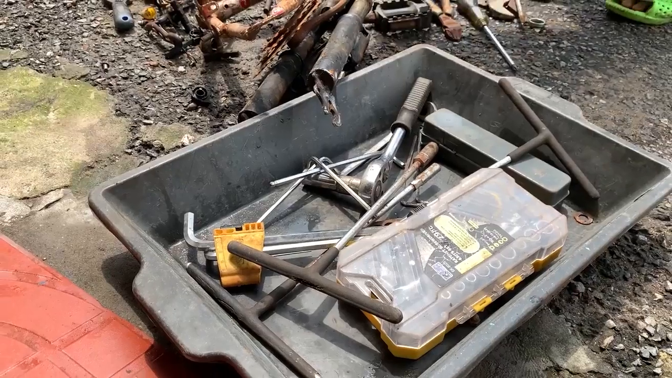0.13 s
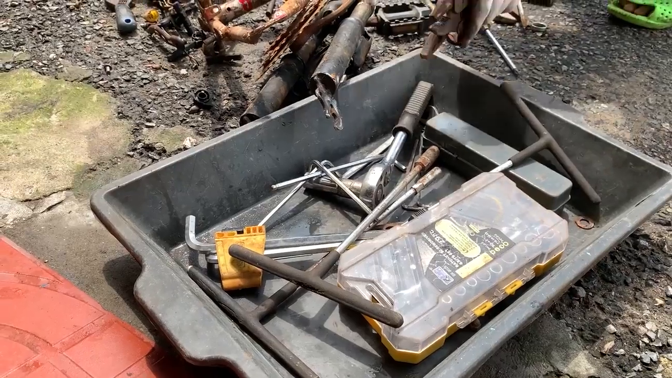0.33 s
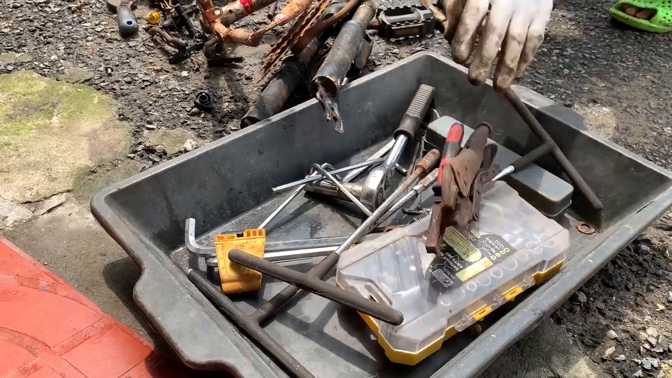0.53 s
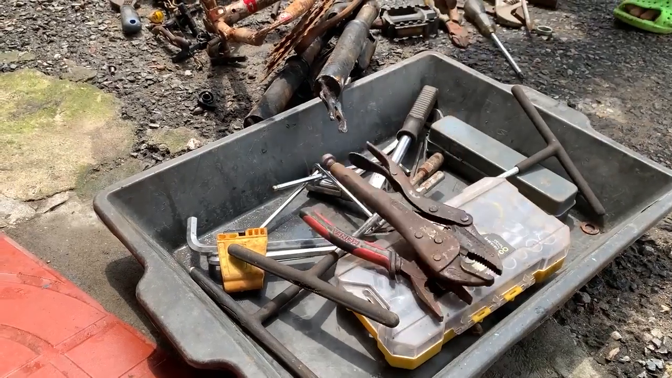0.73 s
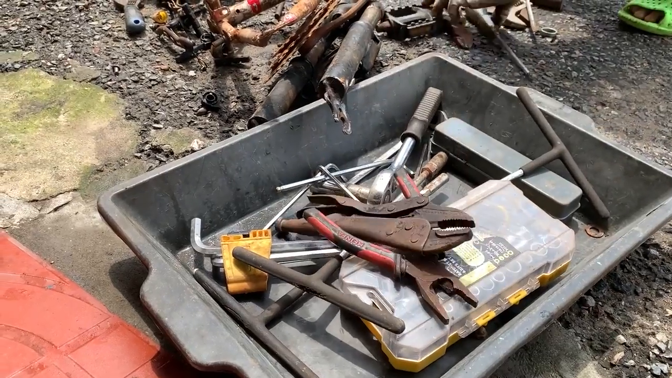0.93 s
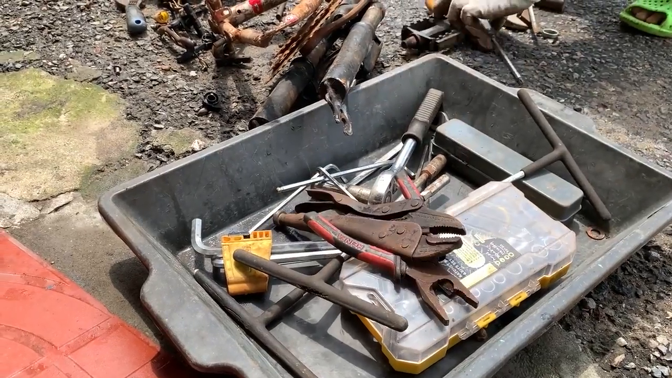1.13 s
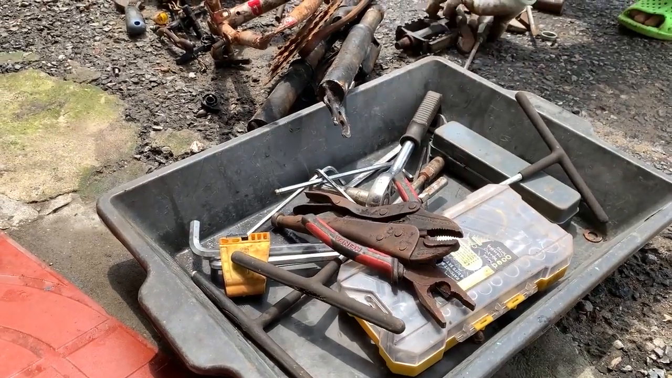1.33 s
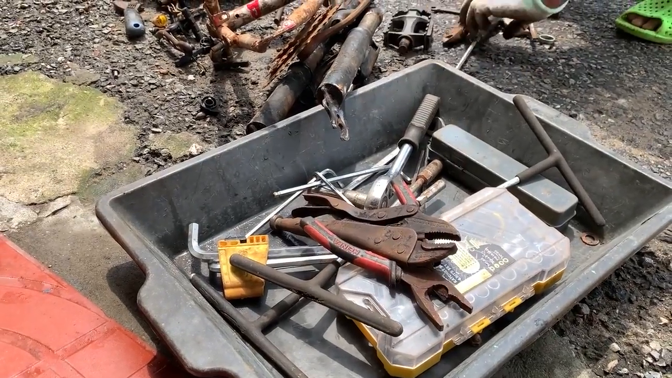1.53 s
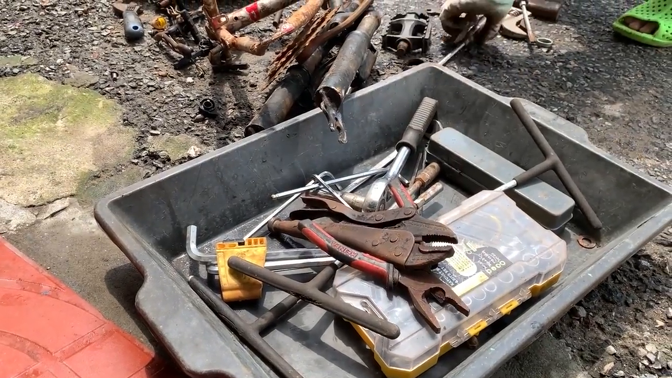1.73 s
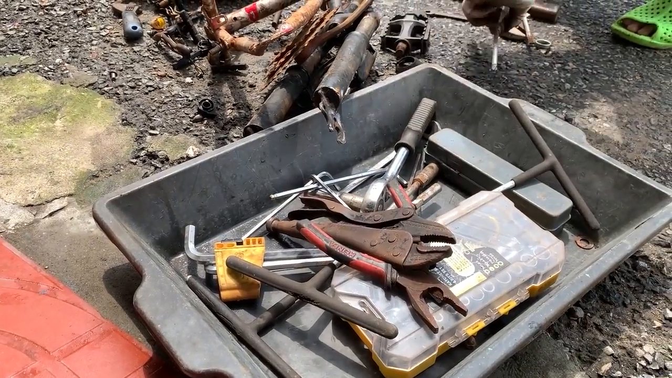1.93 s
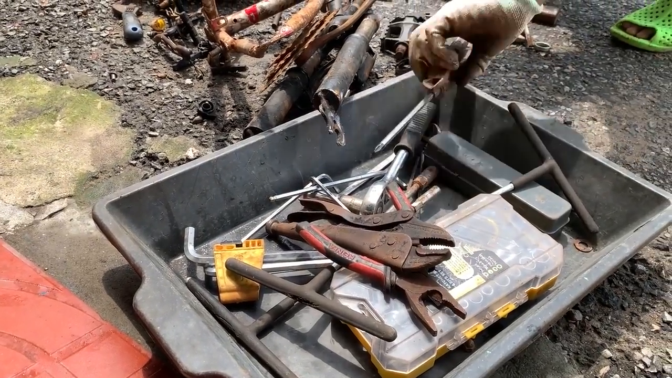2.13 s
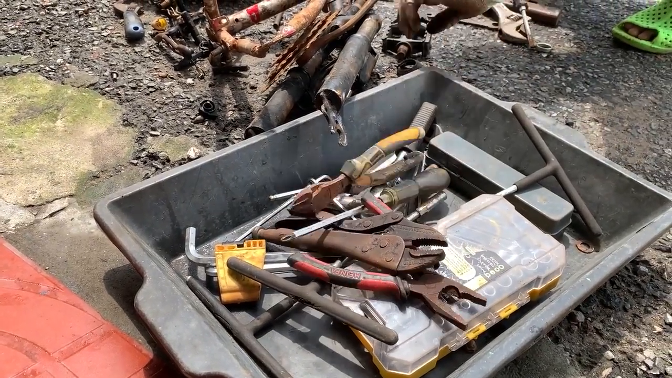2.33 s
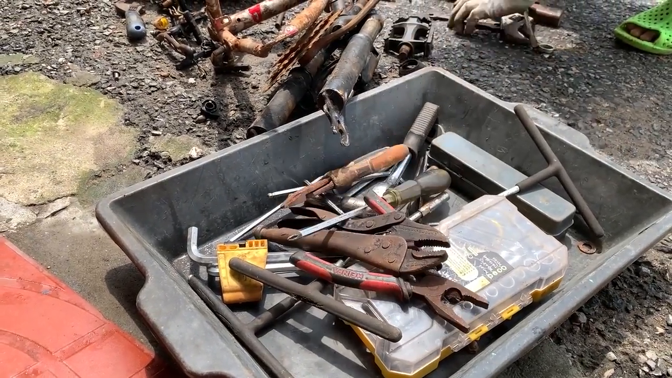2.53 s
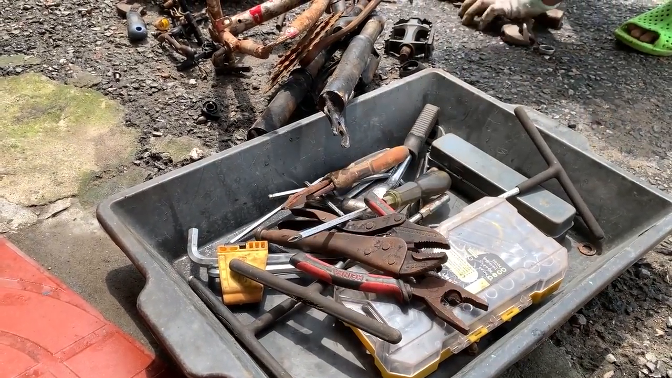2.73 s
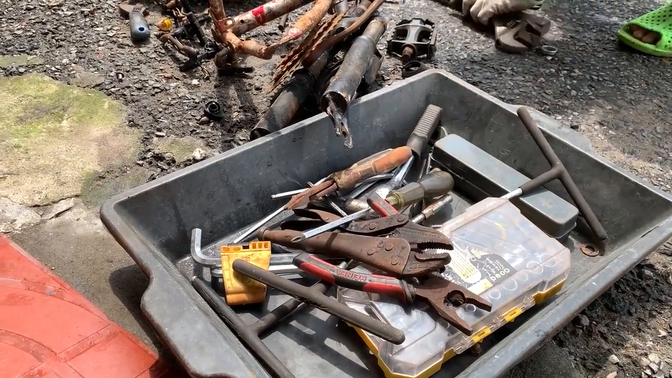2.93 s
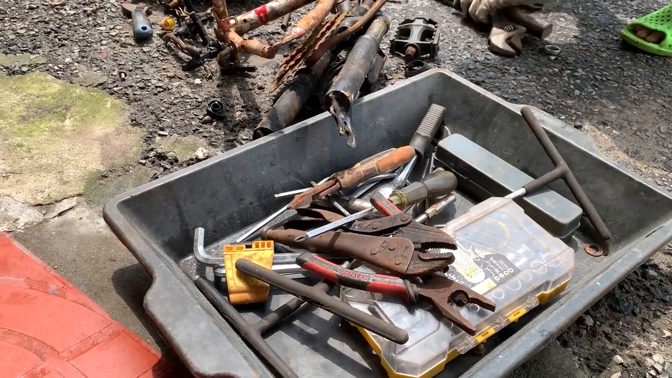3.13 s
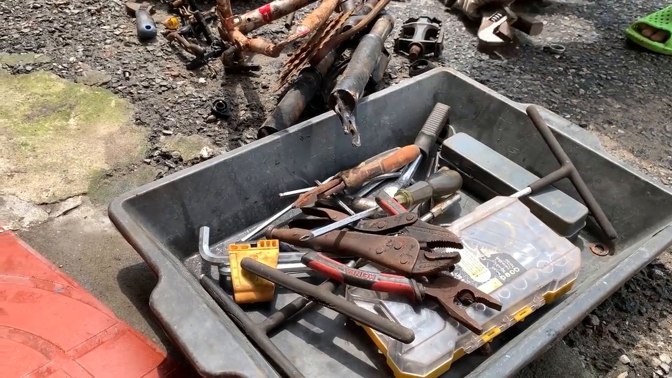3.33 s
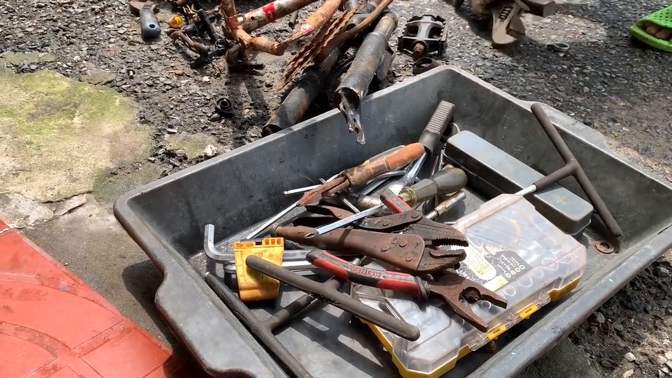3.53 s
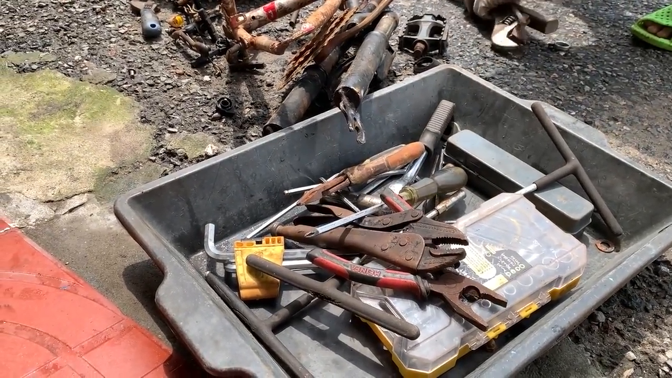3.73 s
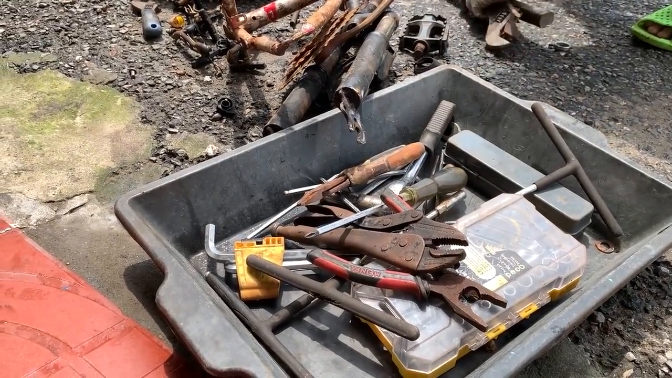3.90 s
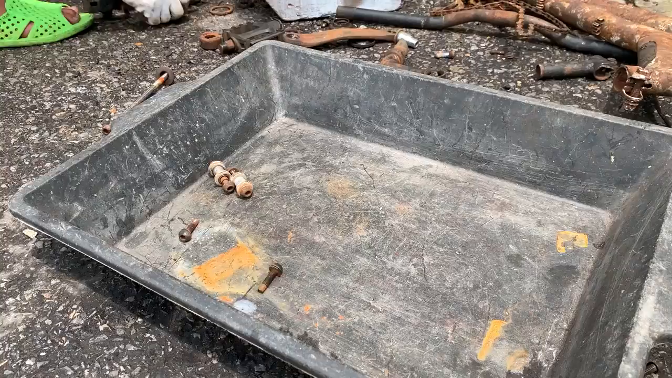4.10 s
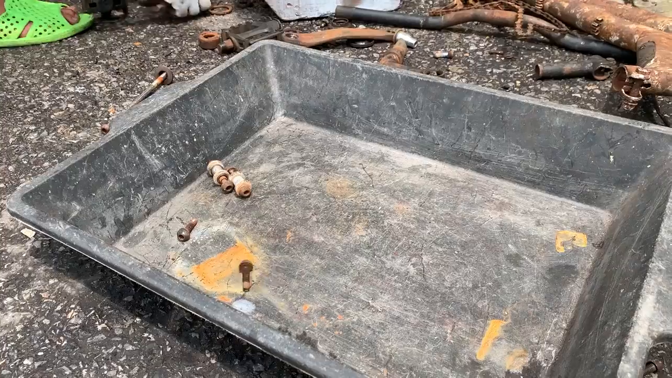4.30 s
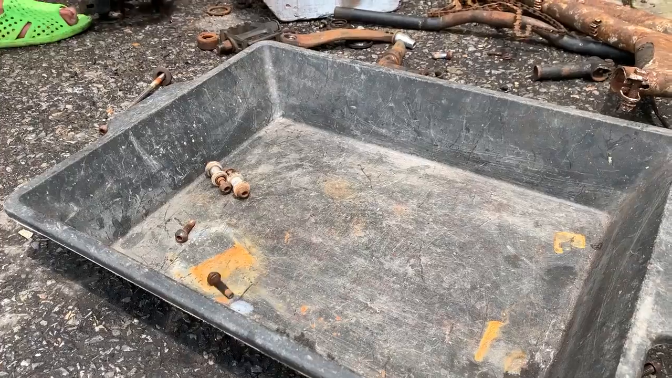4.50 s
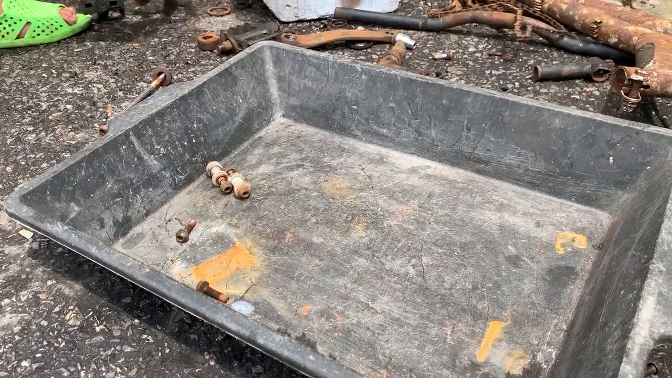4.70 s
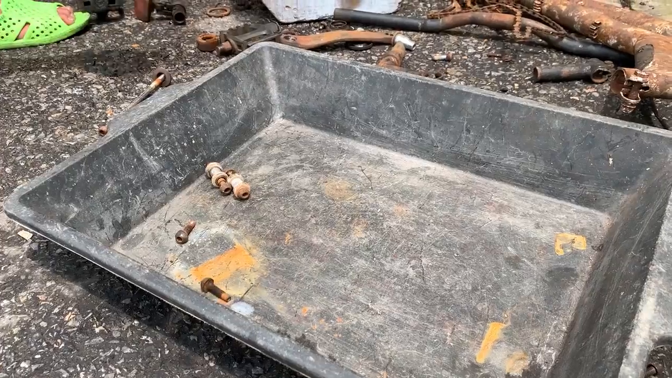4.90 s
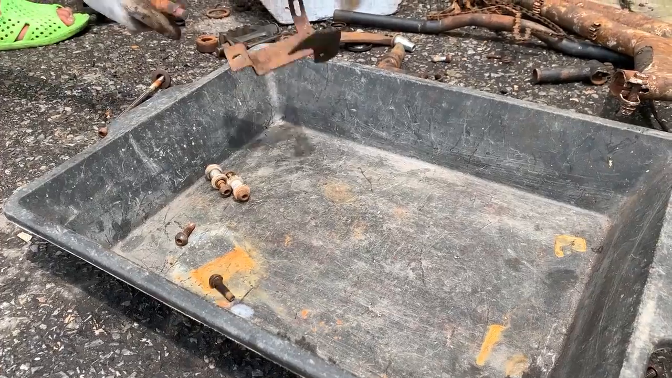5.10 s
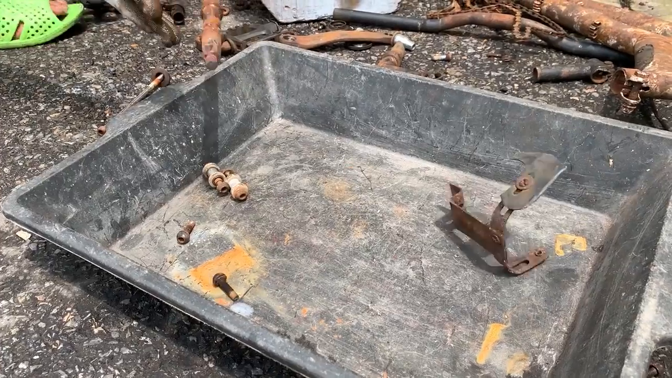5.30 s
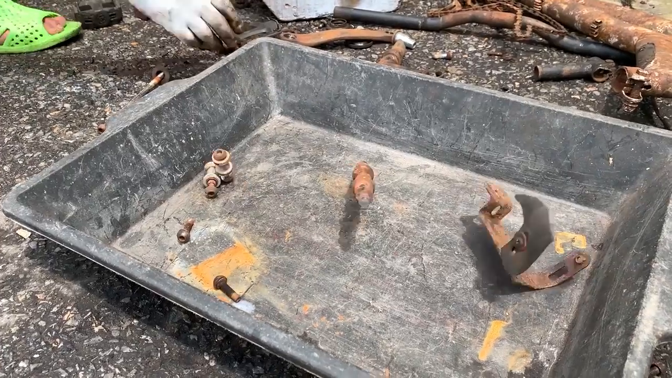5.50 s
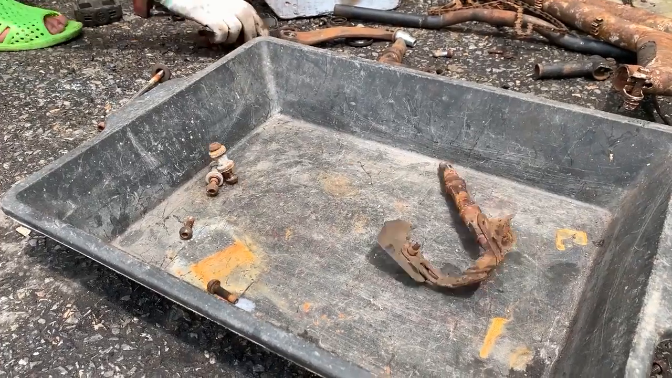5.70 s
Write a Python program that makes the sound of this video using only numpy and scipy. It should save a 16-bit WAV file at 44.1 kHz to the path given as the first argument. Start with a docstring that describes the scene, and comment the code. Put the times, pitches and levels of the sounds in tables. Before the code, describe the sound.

Rusty pliers and a screwdriver clatter into a full plastic tool tray, a spanner scrapes steel parts, then metal pieces thud into an empty tray outdoors.

```python
"""Outdoors on rough pavement, under soft open air and low wind, heard by a close pair of small microphones.
First rusty pliers and a screwdriver drop into a full plastic tray: blows ring its modes with noisy contacts.
Then a spanner scrapes and clinks on bicycle parts: ringing steel modes, friction noise and ticks of grit.
At 4.2 s the scene jumps to an empty tray: parts are picked off the ground with small clinks.
Last, a bracket and a bolt are tossed in and tumble, with thuds, clacks and a dying rattle."""
import sys
import numpy as np
from scipy import signal
from scipy.fft import rfft, irfft
from scipy.io import wavfile
from scipy.ndimage import map_coordinates

SR = 44100
rng = np.random.default_rng(int(sys.argv[2]) if len(sys.argv) > 2 else 0)


def inscribe(sig):
    """Save sig as 16-bit PCM at rate SR to the path in sys.argv[1].

    A 1-D sig is mono; a 2-D sig holds one channel per row.
    Samples are clipped to [-1, 1] before scaling.
    """
    pcm = np.round(np.clip(np.atleast_2d(sig).T, -1, 1) * 32767)
    wavfile.write(sys.argv[1], SR, pcm.astype(np.int16))


N = 253575
TIME = np.arange(N) / SR

# ways each piece can vibrate, by name; "plastic case" stands for the tray wall:
# (frequency [Hz], level [dB], time to fall 60 dB [s])
PIECES = { "pliers": [(4330, 0, .035), (8450, -7, .03), (14300, -4, .05)], "pliers jaw": [(2000, 0, .03),
          (2960, -5, .07)], "screwdriver": [(6260, -10, .06), (13280, 0, .07)], "blade": [(1800, 0, .035)],
          "handle": [(1100, 0, .04), (1190, -1, .04), (1830, -3, .06)], "plastic case": [(262, -4, .09),
          (485, 0, .06)], "lever": [(4380, 0, .09), (7714, -7, .07)], "crank": [(1435, 2, .08),
          (1700, -4, .04), (2500, -4, .025), (3300, -2, .05)], "pedal cage": [(2825, 0, .035)],
          "pedal": [(4450, -10, .11), (6258, 0, .055), (11900, -2, .08)], "nut": [(5168, -17, .3),
          (9991, 0, .15), (12330, -4, .1)], "washer": [(7235, 0, .12)], "pin": [(3600, -6, .28),
          (6445, 0, .11), (8527, -3, .06)], "axle": [(3575, -3, .5), (6578, -5, .18), (7784, 0, .14),
          (8786, -5, .16)], "ground": [(560, 0, .04), (690, -2, .04), (1250, -3, .03)],
          "bolt": [(4091, -1, .35), (5254, 0, .4), (7364, -4, .13), (12950, -11, .4)]}
# floor modes, then wall modes of the full tray: (frequency [Hz], level [dB], time to fall 60 dB [s])
FULL_TRAY = [
    [(173, 0.5, 0.072), (219, -2, 0.14), (250, -2, 0.1), (333, -9, 0.044)],
    [(452, -4.5, 0.052), (489.8, -0.5, 0.041), (537, 2.5, 0.046), (615.5, 1.5, 0.082)],
]
# modes of the tools lying in the tray: (frequency [Hz], level [dB], time to fall 60 dB [s])
TOOL_PILE = [(1110, 5.5, 0.059), (1497, -2, .06), (2046, 1, .07), (2667, -4.5, 0.11), (3053, -3.5, .08)]
# noise colour of parts clacking: (frequency [Hz], level [dB per Hz])
PART_CLACK = [(600, -7.5), (1000, -1), (1700, -3.5), (2300, -5.5), (3000, -10), (6000, -42)]
# noise colour of tools cracking sharply: (frequency [Hz], level [dB per Hz])
TOOL_CRACK = [(2000, -29), (3800, 2.5), (6000, 0), (12000, -1), (14500, 2.5), (16000, -7)]
# noise colour of parts cracking sharply: (frequency [Hz], level [dB per Hz])
PART_CRACK = [(2000, -19), (3800, -3), (6500, -10), (9000, -11.5), (15000, -23.5)]
# noise colour of low wind and of the shuddering trays: (frequency [Hz], level [dB per Hz])
RUMBLE_COLOUR = [(20, -17), (45, -3), (72, -2), (110, -7.5), (200, -18.5), (500, -51)]
# noise colour of grit ticking under steel: (frequency [Hz], level [dB per Hz])
GRIT = [(400, -2.5), (3000, -7.5), (6000, -5.5), (15000, -12.5)]
# the spanner sliding on a rusty part: (start [s], length [s], level [dB])
SLIDES = [(2.715, 0.21, -58), (3.28, 0.24, -54), (3.58, 0.19, -48), (3.7, 0.58, -63), (3.99, 0.33, -51.5)]

PILE_VARY_DB = 5   # how unevenly blows ring the modes of the tool pile
PILE_SPREAD, FLOOR_SPREAD = 0.93, 1   # radians by which modes reach the microphones out of step


def from_db(db):
    """Turns decibels into a gain."""
    return 10 ** (np.asarray(db) / 20)


def rms_one(x):
    """Scales a sound to an rms (average strength) of 1."""
    return x / np.sqrt(np.mean(x ** 2) + 1e-20)


def add(track, s, sound):
    """Lays a sound into a track at time s."""
    start = int(s * SR)
    track[:, start:start + sound.shape[-1]] += sound[..., :N - start]


def coloured(x, spectrum, size=2048):
    """Causal (minimum-phase) filter with the given spectrum; white noise keeps its power."""
    hz, db = np.transpose(spectrum)
    grid = np.log(np.arange(size // 2 + 1) * SR / size + 1)
    # the colour falls off outside its table
    beyond = np.abs(grid - np.clip(grid, np.log(hz[0]), np.log(hz[-1])))
    log_gain = np.log(from_db(np.interp(grid, np.log(hz), db))) - 2 * beyond
    # folding the cepstrum forward in time puts the energy as early as possible
    cepstrum = irfft(log_gain)
    cepstrum[1:size // 2] *= 2
    cepstrum[size // 2 + 1:] = 0
    response = irfft(np.exp(rfft(cepstrum)))
    return signal.fftconvolve(x, response[None] / np.linalg.norm(response), axes=-1)[:, :N]


def stereo_noise(side_db, size=N):
    """Two channels of unit noise that differ by a side part."""
    mid, side = rng.standard_normal((2, size))
    return (mid + from_db(side_db) * side * [[1], [-1]]) / np.hypot(1, from_db(side_db))


def grit(grain_db, side_db):
    """Rust and sand catch in clumps of about a millisecond."""
    clump_db = grain_db * np.minimum(rng.exponential(1, N // 48 + 2), 4.5)
    clumps = from_db(clump_db)
    gain = np.interp(np.arange(N), np.linspace(0, N, len(clumps)), clumps)
    return rms_one(stereo_noise(side_db) * gain)


def swell(t, rise_s):
    """The sound builds up as the blow spreads through the piece."""
    return 1 - np.exp(-t / rise_s)


def felt(hits, slope):
    """Blows (s, strength dB, hardness or brightness dB) as one part of the sound feels them: rows (s, dB)."""
    return [(s, db + slope * hardness) for s, db, hardness in hits]


def struck(hits, modes, spread, vary_db, size=30000):
    """Every blow (s, dB) rings the modes at its own strengths; each reaches the microphones out of step."""
    out, t = np.zeros((2, N)), TIME[:size]
    hz, db, t60 = np.transpose(modes)[..., None]
    rings = from_db(db - 60 * t / t60) * np.exp(2j * np.pi * hz * t)
    rings = rings * swell(t, rise_s=0.00081)
    for s, hit_db in hits:
        chance = rng.standard_normal((3, len(modes)))
        strengths = from_db(vary_db * chance[0]) * np.sign(chance[1])
        weights = strengths * np.exp(1j * spread * chance[2] * [[1], [-1]])
        sound = (weights @ rings).imag
        # the blow's level is that of its first sixtieth of a second
        add(out, s, sound * from_db(hit_db) / np.std(sound[:, :SR // 60]))
    return out


def contacts(hits, t60, ring_db, ring_t60, tail_db, side_db, count=24, size=8000):
    """A rusty contact (s, dB): a quick crunch, damped modes of the spot hit, and scatter from all around."""
    out, t = np.zeros((2, N)), TIME[:size]
    scatter_t60 = 0.17   # s
    crunch, ring, scatter = from_db(-60 * t / np.array([[t60], [ring_t60], [scatter_t60]]))
    for s, hit_db in hits:
        grains = rms_one(from_db(3 * np.repeat(rng.standard_normal(size // 32), 32)))
        hz = 700 * 22 ** ((np.arange(count) + rng.random(count)) / count)
        # higher modes lie further apart and each carries more
        weights = np.sqrt(hz) * stereo_noise(side_db, count)
        cluster = rms_one(weights @ np.sin(2 * np.pi * hz[:, None] * t))
        sound = stereo_noise(side_db, size) * crunch * grains
        sound = sound + from_db(ring_db) * cluster * ring
        sound = sound + from_db(tail_db) * stereo_noise(-4.6, size) * scatter
        sound = sound * swell(t, rise_s=0.0008)
        # the contact's level is that of its first hundredth of a second
        add(out, s, sound * from_db(hit_db) / np.std(sound[:, :SR // 100]))
    return out


def small_ticks(per_s, spread_db):
    """Small contacts at random moments, of uneven strength around 0 dB: rows (s, dB)."""
    count = int(per_s * N / SR)
    moments = rng.uniform(0, N / SR, count)
    return list(zip(moments, spread_db * np.clip(rng.standard_normal(count), -2, 1)))


def rubbed(modes, friction):
    """Friction keeps the modes ringing unevenly; rms 1."""
    out = 0
    for hz, db, t60 in modes:
        r = from_db(-60 / (t60 * SR))   # what one sample of fading leaves of the ring
        poles = [1, -2 * r * np.cos(2 * np.pi * hz / SR), r * r]
        out = out + from_db(db) * rms_one(signal.lfilter([1, 0, -1], poles, friction))
    return rms_one(out)


def strokes(rows):
    """Gain of movements (start s, length s, dB): each swells from nothing and eases off again."""
    skew = .7   # under 1: a stroke speeds up faster than it slows down
    gain = 0
    for s, length, db in rows:
        progress = np.clip((TIME - s) / length, 0, 1)
        gain = gain + from_db(db) * np.sin(np.pi * progress ** skew) ** 2
    return gain


def rocking(drops):
    """Gain of the rattle after drops (s, dB, t60 s): it builds up quickly and dies away evenly."""
    out = 0
    for s, db, t60 in drops:
        age = np.maximum(TIME - s, 0)
        out = out + swell(age, rise_s=0.0052) * from_db(db - 60 * age / t60)
    return out


def flutter(depth_db, per_s):
    """A gain that wanders as a ringing piece turns in the hand."""
    knots = np.arange(0, N / SR + 1, 1 / per_s)
    return from_db(depth_db * np.interp(TIME, knots, rng.standard_normal(len(knots))))


def wavering(x):
    """The pitch of a held piece shifts a little as grip and contact change."""
    share, per_s = .0005, 30   # size of the random shifts as a share of the pitch, how many a second
    knots = np.arange(0, N / SR + 1, 1 / per_s)
    shifts = np.diff(rng.standard_normal(len(knots) + 1))
    place = np.cumsum(1 + share * np.interp(TIME, knots, shifts))
    return np.array([map_coordinates(channel, [place], order=5) for channel in x])


def scattered(x):
    """The ground and the heap of parts throw a ring back in many faint echoes."""
    echo_db, echo_t60 = -13, 0.36   # dB, s
    t = TIME[:SR // 2]
    echoes = rng.standard_normal((2, len(t))) * from_db(-60 * t / echo_t60)
    echoes = echoes / np.linalg.norm(echoes[0])
    return x + from_db(echo_db) * signal.fftconvolve(x, echoes, axes=-1)[:, :N]


def from_left(x, lag_ms):
    """A sound off to the left reaches the right microphone later."""
    return np.array([x[0], np.roll(x[1], int(round(lag_ms * SR / 1000)))])


def open_air(before_jump):
    """The hush of the open air is steady coloured noise, softer after the jump."""
    before_db, after_db = -66.5, -69.5
    # noise colour of the open air: (frequency [Hz], level [dB per Hz])
    air_colour = [(60, -24), (140, 7.5), (280, -1), (500, 0), (900, -11), (2000, -16.5), (5000, -21.5),
                  (9000, -27.5), (16000, -42)]
    level = from_db(after_db + (before_db - after_db) * before_jump)
    return level * coloured(stereo_noise(side_db=-3.0), air_colour)


def wind_rumble(before_jump):
    """Moving air buffets the microphones: low noise with two swells, calmer after the jump."""
    breeze_db, calm_db = -69, -75.5   # before and after the jump, ahead of the shared 3.5 dB lift
    # low buffets of air, ahead of the same lift: (start [s], length [s], level [dB])
    buffets = [(3.54, 0.3, -56.5), (5.16, 0.27, -52)]
    wind = from_db(calm_db + (breeze_db - calm_db) * before_jump) + strokes(buffets)
    return from_db(3.5) * coloured(stereo_noise(side_db=-15.0), RUMBLE_COLOUR) * wind


def glove():
    """A soft, dull brush of cloth as a tool slips out of the glove."""
    # the brush of cloth: (start [s], length [s], level [dB])
    brushes = [(2.192, 0.2, -58)]
    return coloured(stereo_noise(side_db=-8), PART_CLACK) * strokes(brushes)


def pavement():
    """Steel jingles on steel and stone; between the ticks the parts scrape and grit ticks under them."""
    # steel touching steel and pavement: (time [s], strength [dB], hardness [dB])
    ground_hits = [(1.187, -43, 3), (1.468, -28, 7.5), (1.553, -41, 4), (1.634, -42, 6.5),
                   (1.809, -42, 5.5), (1.825, -38, 8), (2.755, -30.5, 8.5), (2.793, -32.5, 20.5),
                   (2.971, -37.5, -0.5), (3.008, -34, 9), (3.365, -42, 4.5), (3.547, -42.5, 5),
                   (3.579, -48.5, 3.5), (3.855, -36, 8), (4.062, -53.5, -0.5), (4.46, -40, 7),
                   (4.624, -50, 3), (4.672, -45, 2.5), (4.79, -38.5, 4), (4.844, -41, 3)]
    # noise colour of clacks on the ground: (frequency [Hz], level [dB per Hz])
    ground_clack = [(200, -3), (700, -5), (1400, -2), (2100, -9), (3000, -1.5), (6000, -26.5)]
    # steel dragged over grit: (start [s], length [s], level before mixing [dB])
    scrapes = [(1.41, 0.31, -53), (2.66, 0.3, -55), (2.965, 0.17, -48.5), (3.12, 0.43, -58.5),
               (3.53, 0.31, -60), (3.96, 0.25, -56.5), (4.4, 0.69, -64)]
    # a harder touch clacks less and cracks more
    clack_hits, crack_hits = felt(ground_hits, -2.31), felt(ground_hits, 0.17)
    clacks = contacts(clack_hits, t60=0.028, ring_db=-5, ring_t60=0.04, tail_db=-13, side_db=-7)
    clacks = coloured(clacks, ground_clack)
    cracks = contacts(crack_hits, t60=0.009, ring_db=-12, ring_t60=0.045, tail_db=-21, side_db=-18,
                      count=48)
    cracks = coloured(cracks, TOOL_CRACK)
    grains = small_ticks(per_s=75, spread_db=3)
    ticks = contacts(grains, t60=0.027, ring_db=-15, ring_t60=0.14, tail_db=-28.0, side_db=-4.5,
                     count=14, size=4000)
    ticks = coloured(ticks, GRIT)
    scrape = coloured(grit(grain_db=6.0, side_db=-3.5), ground_clack)
    dragging = (from_db(-4) * ticks + from_db(-6) * scrape) * strokes(scrapes)
    return from_db(-1.5) * clacks + from_db(-15.5) * cracks + dragging


def settling():
    """Dropped pieces rock and bounce on each other, keep the walls humming and make the tray shudder."""
    # a tool rocks to rest: (time [s], rattle [dB], time to fall 60 dB [s], wall hum against rattle [dB])
    tool_drops = [(0.616, -34, 0.61, 6), (0.891, -42.5, 0.92, 2), (2.282, -28, 0.42, -1),
                  (2.52, -45, 0.39, 4)]
    # a part rocks to rest: (time [s], rattle [dB], time to fall 60 dB [s])
    part_drops = [(5.245, -52.5, 4.4), (5.49, -51.5, 4.1)]
    tool_shudder_db, part_shudder_db = -15.5, -5   # against the rattle's gain
    tools = rocking([(s, db, t60) for s, db, t60, hum in tool_drops])
    parts = rocking(part_drops)
    humming = rocking([(s, db + hum, t60) for s, db, t60, hum in tool_drops]) + parts
    chatter = coloured(grit(grain_db=4.0, side_db=-1.5), PART_CLACK)
    chatter = chatter + from_db(-3.0) * coloured(grit(grain_db=4.5, side_db=-3.0), PART_CRACK)
    knocks = small_ticks(per_s=45, spread_db=4)
    bounces = contacts(knocks, t60=0.02, ring_db=0, ring_t60=0.04, tail_db=-23.5, side_db=-8,
                       count=14, size=2400)
    bounces = coloured(bounces, PART_CLACK)
    clatter = struck(knocks, TOOL_PILE, PILE_SPREAD, PILE_VARY_DB, size=6000)
    walls = rubbed(FULL_TRAY[1], grit(grain_db=4.5, side_db=-5.0))
    shaking = from_db(tool_shudder_db) * tools + from_db(part_shudder_db) * parts
    shudder = coloured(stereo_noise(side_db=-3.0), RUMBLE_COLOUR) * shaking
    rattle = (from_db(-10) * chatter + from_db(-4.5) * bounces) * (tools + parts)
    rattle = rattle + from_db(-6) * clatter * tools
    return rattle + from_db(-3.0) * walls * humming + shudder


def clinks():
    """Each piece gives a tick where it is hit and rings with its own few modes."""
    # blows that make pieces ring, thud on the ground or knock the tray wall (there called "plastic case"):
    # (time [s], level [dB], piece)
    clink_hits = [(0.59, -33, "pliers jaw"), (0.646, -36, "pliers jaw"), (0.878, -33, "pliers"),
                  (1.016, -47, "pliers"), (2.271, -35, "pliers"), (2.354, -39, "pliers"),
                  (0.592, -27, "plastic case"), (2.515, -31, "plastic case"), (2.282, -23, "handle"),
                  (2.315, -41, "blade"), (2.333, -38, "blade"), (2.514, -35, "screwdriver"),
                  (1.472, -51, "lever"), (1.634, -56, "lever"), (4.0, -54, "lever"), (2.493, -48, "crank"),
                  (2.755, -47, "crank"), (2.972, -45, "crank"), (4.79, -59, "crank"),
                  (2.991, -44, "pedal cage"), (3.022, -52, "pedal cage"), (3.039, -49, "pedal cage"),
                  (2.984, -53, "pedal"), (3.006, -43, "pedal"), (3.212, -54, "nut"), (3.856, -54, "washer"),
                  (4.460, -52, "pin"), (4.624, -59, "pin"), (4.672, -53, "pin"), (4.846, -48, "axle"),
                  (4.844, -55, "ground"), (5.672, -39.5, "bolt")]
    rings = 0
    for name, modes in PIECES.items():
        own_hits = [(s, db) for s, db, piece in clink_hits if piece == name]
        rings = rings + struck(own_hits, modes, spread=0.19, vary_db=0.5)
    all_hits = [(s, db) for s, db, piece in clink_hits]
    ticks = contacts(all_hits, t60=.012, ring_db=-30, ring_t60=0.059, tail_db=-20.5, side_db=-7)
    return rings * flutter(depth_db=3.5, per_s=70) + from_db(-10) * ticks


def jangle():
    """The sliding spanner catches on the pedal in many small contacts; each rings other modes of it."""
    catches = small_ticks(per_s=60, spread_db=3.0)
    pedal_modes = PIECES["pedal cage"] + PIECES["pedal"]
    pings = struck(catches, pedal_modes, PILE_SPREAD, vary_db=9, size=3200)
    tinkle = contacts(catches, t60=0.011, ring_db=2, ring_t60=0.025, tail_db=-33, side_db=5,
                      count=10, size=3200)
    tinkle = coloured(tinkle, GRIT)
    return (from_db(-12) * pings + from_db(-12) * tinkle) * strokes(SLIDES)


def spanner():
    """Knocks make it tick and sing very high, sliding makes it rough; each mode group flutters on its own."""
    # blows that set the spanner ringing: (time [s], strength [dB], brightness [dB])
    spanner_hits = [(1.638, -55, 2), (2.717, -52, 3), (2.735, -31.5, 1), (2.762, -42, 11), (3.33, -57, 0),
                    (3.383, -42, -3), (3.66, -48, -6), (3.777, -58, 1), (4.002, -54, 3), (4.079, -31, 9)]
    # low, middle and top modes: (frequency [Hz], level [dB], time to fall 60 dB when free [s])
    spanner_modes = [
        [(4075, -15, .26), (4335, -21, .2), (5486, -21, .15), (8695, 0, .18)],
        [(11190, -17, .23), (13390, 0, .19)],
        [(14390, 0, .17), (14450, -3, .05)],
    ]
    # what the (low, middle, top) modes gain per dB of brightness [dB]
    brightness_gain = (-0.87, 0.2, 0.99)
    # noise colour of its ticks: (frequency [Hz], level [dB per Hz])
    tick_colour = [(5000, -22), (13000, 0)]
    contact_damping = .4   # share of its ring time that it keeps while pressed against rust
    friction = grit(grain_db=7, side_db=-10)
    sliding = strokes(SLIDES)
    ticks = contacts(felt(spanner_hits, 0), t60=.012, ring_db=-4, ring_t60=.04, tail_db=-22, side_db=-8)
    out = from_db(-9) * coloured(ticks, tick_colour)
    for gain, modes, slide_db in zip(brightness_gain, spanner_modes, (0, -6, -2)):
        ring = struck(felt(spanner_hits, gain), modes, spread=.15, vary_db=1.0)
        damped = [(hz, db, t60 * contact_damping) for hz, db, t60 in modes]
        ring = ring + from_db(slide_db) * rubbed(damped, friction) * sliding
        out = out + ring * flutter(depth_db=3.5, per_s=110)
    return out


def tray(hits, answer_db, modes, clack_colour, crack_colour):
    """A blow thumps the plastic floor, booms in the walls, and clacks and cracks where it lands."""
    thud, boom, clack, crack = from_db(answer_db)
    floor, walls = modes
    # a harder blow moves the tray less and cracks more (dB per dB of hardness)
    push, edge = felt(hits, -1.2), felt(hits, 0.5)
    body = thud * struck(push, floor, FLOOR_SPREAD, vary_db=4.0)
    body = body + boom * struck(push, walls, spread=0.12, vary_db=3.5)
    clacks = contacts(felt(hits, 0), t60=0.019, ring_db=-6.0, ring_t60=0.046, tail_db=-11.0,
                      side_db=-10.5, count=48)
    cracks = contacts(edge, t60=0.057, ring_db=-9, ring_t60=0.078, tail_db=-15.5,
                      side_db=-1.5, count=48)
    return body + clack * coloured(clacks, clack_colour) + crack * coloured(cracks, crack_colour)


def empty_tray():
    """Parts tossed into the empty tray, a little to the left, thump its bare plastic and clack on it."""
    # parts landing: (time [s], strength [dB], hardness [dB])
    part_hits = [(5.243, -32, -0.5), (5.257, -44.5, -7.5), (5.268, -39.5, 0), (5.28, -43.5, -7),
                 (5.343, -45, -1.5), (5.461, -47, 2), (5.485, -28, 7.5), (5.489, -27, 1.5),
                 (5.546, -44, -0.5), (5.579, -44.5, 0), (5.609, -47, -4), (5.628, -36, 1),
                 (5.657, -44.5, -7.5), (5.672, -40.5, 19.5), (5.718, -44, -1)]
    # answer to a blow, against its strength: (floor thud [dB], wall boom [dB], clack [dB], crack [dB])
    empty_answer = (-4, -1, -1, -9.5)
    # floor modes, then wall modes: (frequency [Hz], level [dB], time to fall 60 dB [s])
    empty_modes = [
        [(136, -10.5, 0.22), (188, 1, 0.026), (225, 2, 0.18), (265.3, -3, 0.28)],
        [(332, 12, 0.0083), (477, -2.5, 0.07), (575, -9, 0.092), (658, -4.5, 0.063)],
    ]
    return from_left(tray(part_hits, empty_answer, empty_modes, PART_CLACK, PART_CRACK), lag_ms=0.1)


def full_tray():
    """A blow also rings the tools lying in the tray, and a heavy landing presses through to the floor."""
    # tools landing; hardness above 0 is steel on steel, below 0 steel on plastic:
    # (time [s], strength [dB], hardness [dB])
    tool_hits = [(0.59, -26.5, 3.5), (0.597, -34, -1), (0.614, -21.5, 5), (0.645, -27, 5.5),
                 (0.671, -38, 1), (0.703, -42.5, 0), (0.752, -49, -7), (0.763, -43, 6), (0.88, -31.5, 8.5),
                 (0.887, -39.5, 7), (0.913, -54.5, -12.5), (1.017, -43.5, 10), (1.073, -49.5, -0.5),
                 (2.272, -40, 3), (2.28, -23.5, 8.5), (2.355, -31, 8), (2.514, -30.5, 0.5), (2.546, -41, 0)]
    # answer to a blow, against its strength: (floor thud [dB], wall boom [dB], clack [dB], crack [dB])
    full_answer = (-6, 0, -1.5, -3.5)
    # noise colour of tools clacking: (frequency [Hz], level [dB per Hz])
    tool_clack = [(600, -29), (850, -20.5), (1120, -1), (1450, -3.5), (1900, -3), (2400, -4), (3100, -9.5),
                  (4200, -28.5), (7000, -21.5)]
    # heavy landings that thump the floor: (time [s], level [dB])
    floor_thumps = [(0.6, -45.5), (2.286, -42.5)]
    blows = tray(tool_hits, full_answer, FULL_TRAY, tool_clack, TOOL_CRACK)
    pile = struck(felt(tool_hits, 0), TOOL_PILE, PILE_SPREAD, PILE_VARY_DB)
    thumps = struck(floor_thumps, FULL_TRAY[0], FLOOR_SPREAD, vary_db=7.5)
    return blows + from_db(-12) * pile + thumps


def scene():
    """The spanner's ring breaks off at the jump; the open air goes on throughout, calmer afterwards."""
    jump_s = 4.2
    before_jump = np.clip((jump_s - TIME) / .002, 0, 1)   # 1 before, 0 after
    background = wind_rumble(before_jump) + open_air(before_jump)
    loose = pavement() + scattered(clinks())
    held = scattered(wavering(spanner()) + jangle())
    steel = (loose + held) * before_jump
    # after the jump the loose steel lies to the left
    steel = steel + from_left(loose, lag_ms=0.16) * (1 - before_jump)
    close = full_tray() + empty_tray() + settling() + steel + glove()
    # the close sounds are slightly stronger on the right
    return close * from_db([[-.5], [.5]]) + background


def port(x, hz, width_hz):
    """A microphone port turns the phase once round near its resonance."""
    r = np.exp(-np.pi * width_hz / SR)
    poles = [1, -2 * r * np.cos(2 * np.pi * hz / SR), r * r]
    return signal.lfilter(poles[::-1], poles, x)


def record(dry):
    """The left microphone's ports set the channels against each other near 10 kHz; deep bass and top are cut."""
    left = port(port(dry[0], hz=10650, width_hz=3400), hz=15200, width_hz=2000)
    bass_cut = signal.butter(2, 45, "high", fs=SR, output="sos")
    top_cut = signal.ellip(8, .3, 80, 15950, fs=SR, output="sos")
    pair = signal.sosfilt(bass_cut, [left, dry[1]])
    return signal.sosfilt(top_cut, pair)


dry = scene()
out = record(dry)
inscribe(out)
```